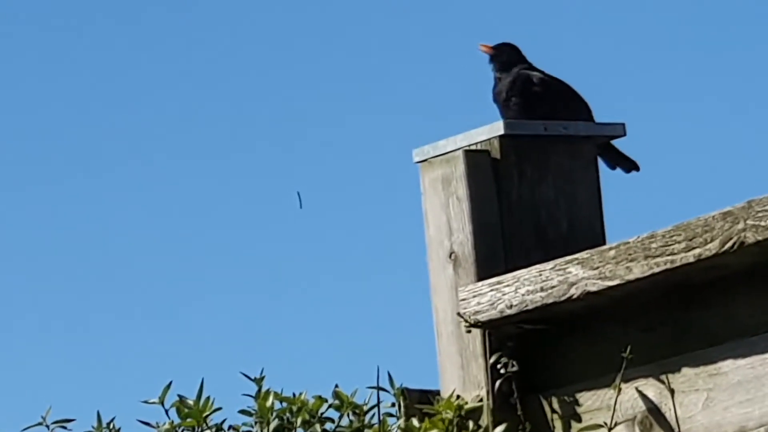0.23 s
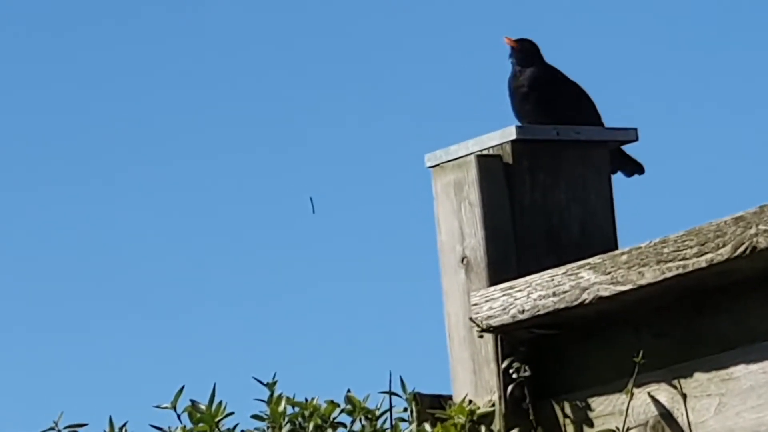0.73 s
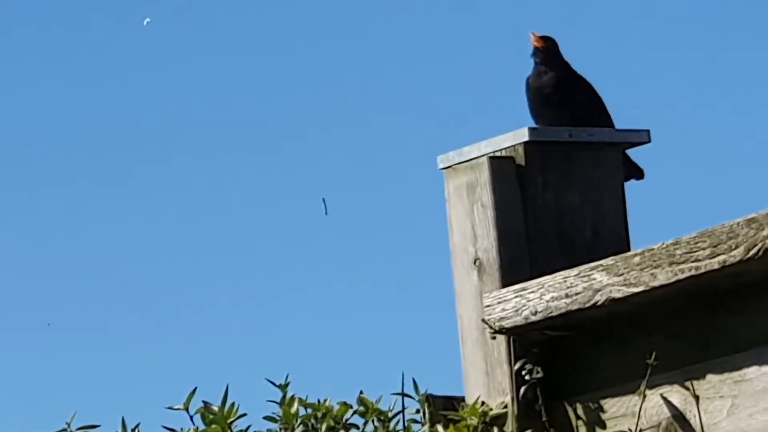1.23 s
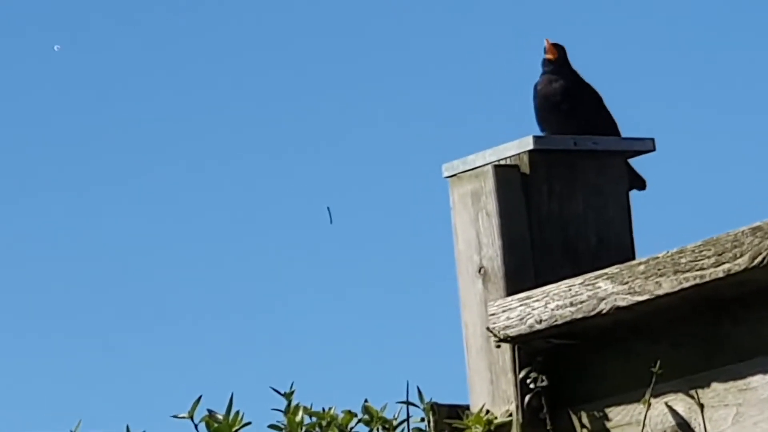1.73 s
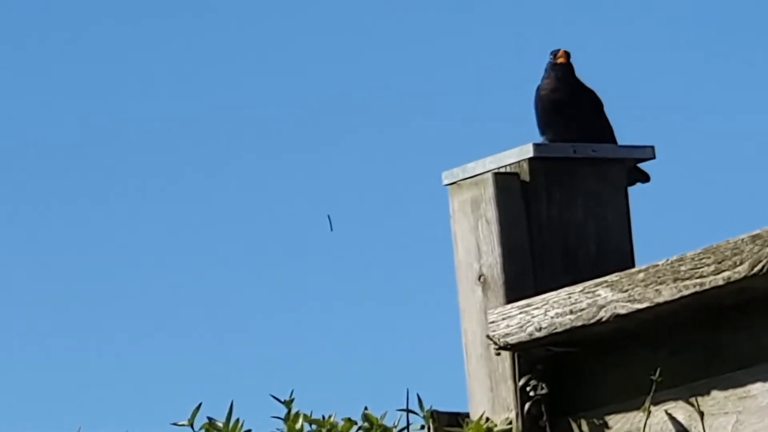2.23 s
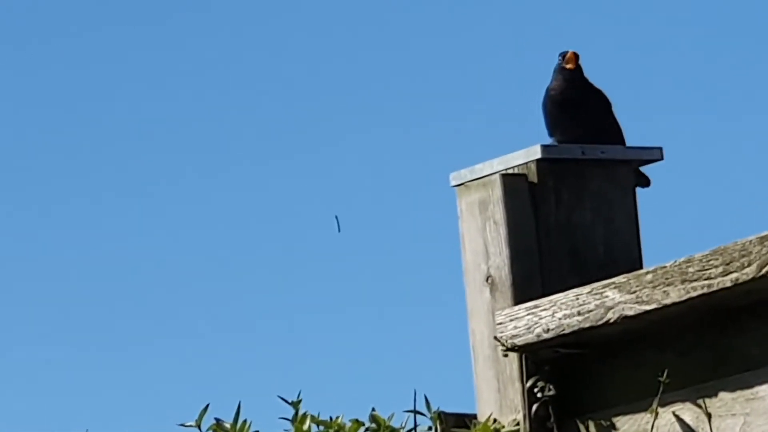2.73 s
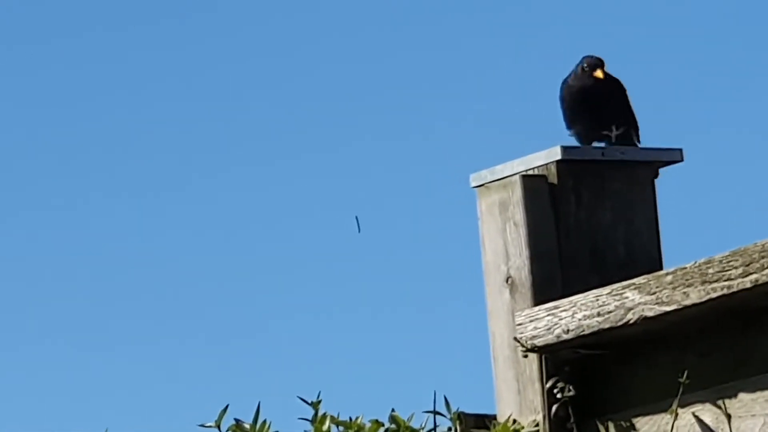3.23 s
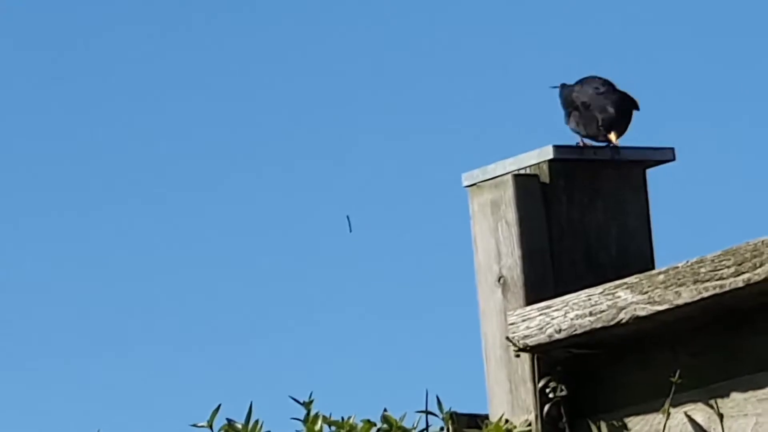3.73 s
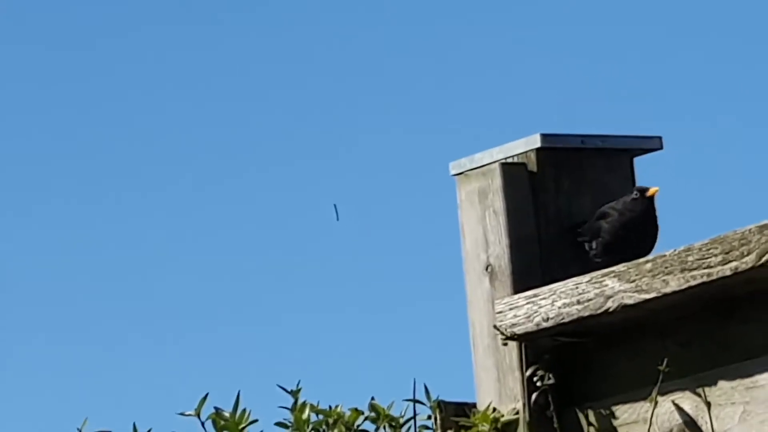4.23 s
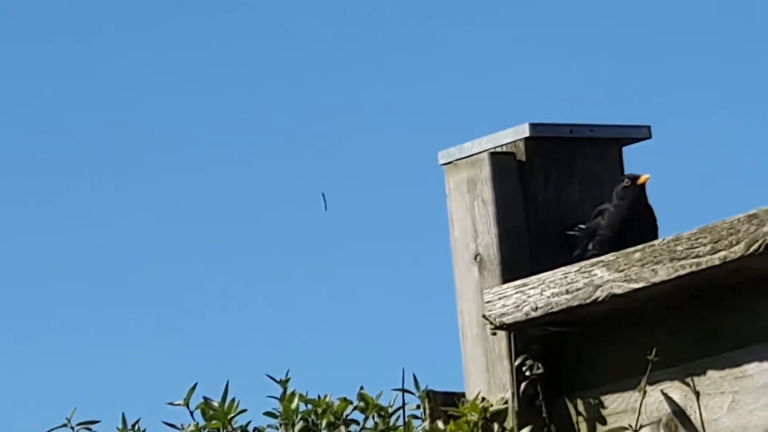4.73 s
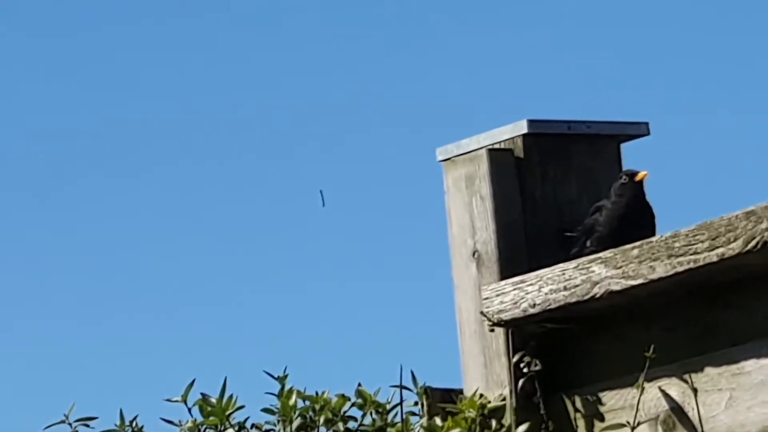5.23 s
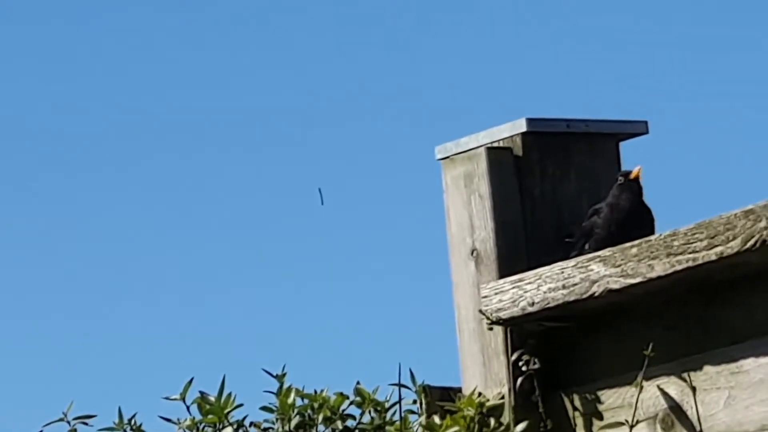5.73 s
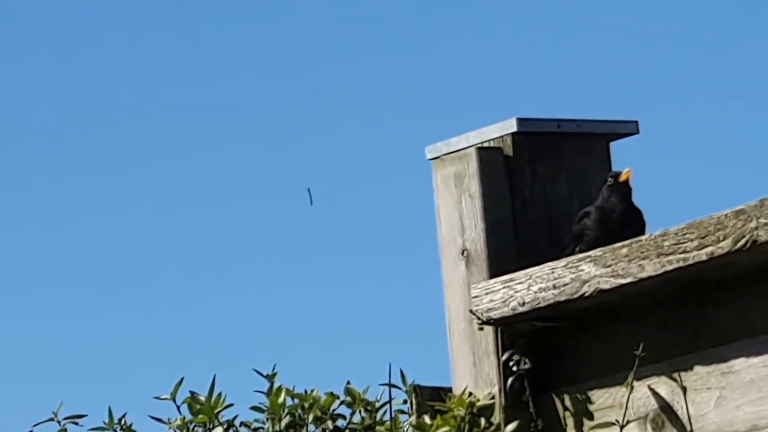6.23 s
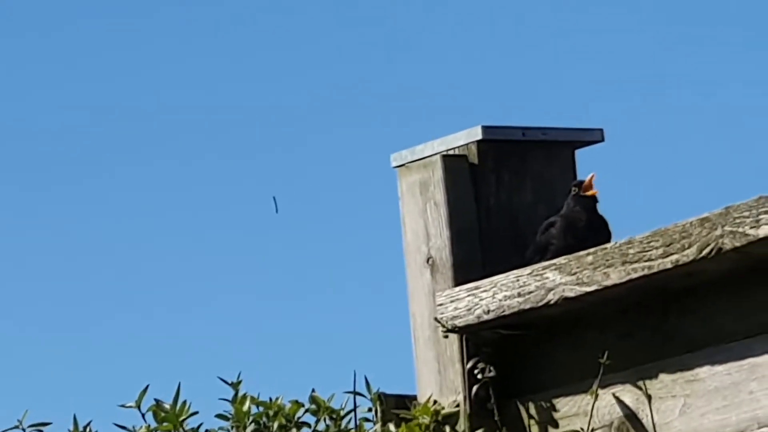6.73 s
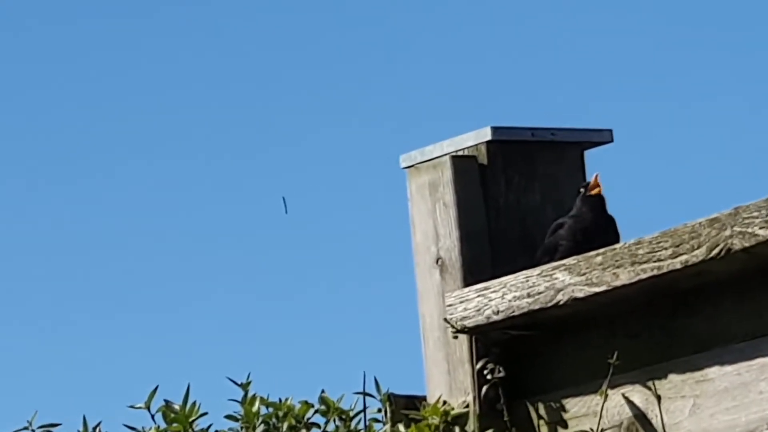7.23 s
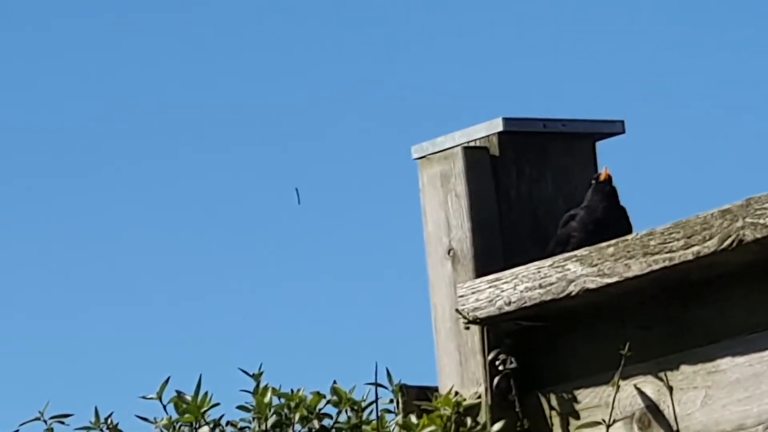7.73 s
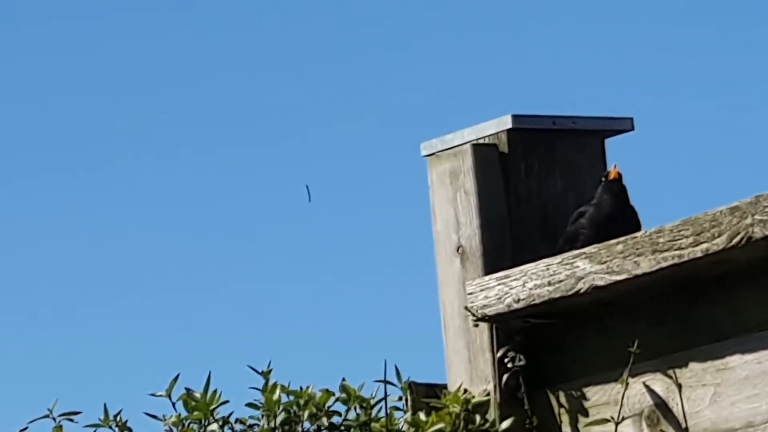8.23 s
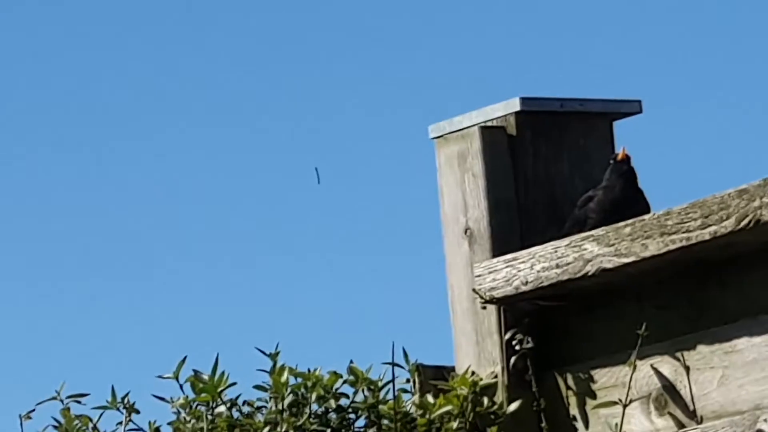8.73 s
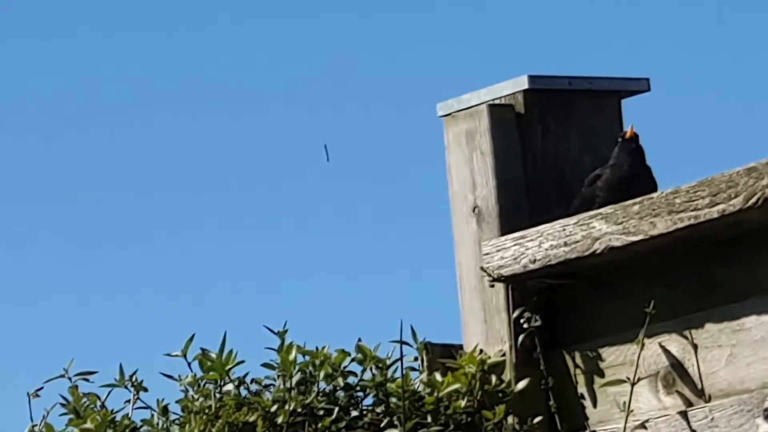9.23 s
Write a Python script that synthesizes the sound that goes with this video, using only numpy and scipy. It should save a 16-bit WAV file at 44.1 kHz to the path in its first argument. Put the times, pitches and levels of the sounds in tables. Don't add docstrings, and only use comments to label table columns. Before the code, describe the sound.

A small stereo camera microphone outdoors catches faint hiss, a steady low electrical hum near 50 Hz and soft distant traffic, with far engines drifting against the hum. At 0.2 s a blackbird begins with a rising flute-like whistle, a loud falling note and a hoarse double tone until 0.8 s. From 1.0 to 2.9 s it sings reedy two-voiced whistles, quick slurs, a loud upward sweep at 2.0 s and a steep climb with a sharp pip. Wings flutter in soft, bassy puffs at 3.0-3.3 s. Near-silence follows, with faint low pips around 4.4-5.2 s. Quiet notes resume at 5.4 s, growing into strong whistles from 6.0 s, a rising note at 6.7 s and a loud falling one at 7.0 s. A buzzy rattle runs 7.25-7.6 s, then thin squeaks and plunging twitters from 7.9 to 8.6 s. Short wall echoes blur the notes; a clear dry tick lands at 9.2 s.

```python
import sys
import numpy as np
from scipy import signal
from scipy.fft import rfft, irfft, next_fast_len
from scipy.io import wavfile
from scipy.ndimage import uniform_filter1d, minimum_filter1d, map_coordinates

SR = 44100
rng = np.random.default_rng(int(sys.argv[2]) if len(sys.argv) > 2 else 0)


def wav_record(signal):
    frames = np.transpose(np.atleast_2d(signal))
    bounded = np.clip(frames, -1, 1)
    quanta = np.round(bounded * 32767).astype(np.int16)
    wavfile.write(sys.argv[1], SR, quanta)


def invert_db(level):
    return 10 ** (np.asarray(level, dtype=float) / 20)


N = 417627


def unit(x):
    return x / np.sqrt(np.mean(x ** 2) + 1e-20)


def along(points, hz):
    f, v = np.transpose(points)
    return np.interp(np.log(hz + 1), np.log(f + 1), v)


def wobble(rate_hz, size=N):
    knots = rng.standard_normal(max(size, SR // 2) * 1500 // SR + 8)
    return map_coordinates(knots, [np.arange(size) * min(rate_hz, 1500) / SR])


def filtered(x, response):
    m = next_fast_len(N + SR // 2)
    return irfft(rfft(x, m) * response(np.fft.rfftfreq(m, 1 / SR)), m)[..., :N]


def add(track, start_s, sound, pan_db):
    part = track[:, round(start_s * SR):][:, :sound.shape[-1]]
    part += invert_db(np.array([[pan_db / 2], [-pan_db / 2]])) * sound[..., :part.shape[1]]


def rush(spectrum):
    # freq_hz, likeness
    alike = [(60, 0.35), (200, 0.33), (640, 0.28), (1400, 0)]
    # freq_hz, level_db
    left = [(60, 4.5), (400, 1.5), (1300, 0.5), (4400, 1), (6500, 9), (8100, 3), (15000, 3.5)]

    def mid_side(hz):
        turn_rad = np.arccos(np.clip(along(alike, hz), -1, 1)) / 2
        return invert_db(along(spectrum, hz)) * [np.cos(turn_rad), np.sin(turn_rad)]

    mid, side = filtered(rng.standard_normal((2, N)), mid_side)
    ports = np.array([mid + side, mid - side])
    return unit(filtered(ports, lambda hz: invert_db(along(left, hz) * [[.5], [-.5]])))


def hiss():
    # freq_hz, density_db (per Hz)
    spectrum = [(530, -17), (900, -6.5), (956, -8), (1250, -10), (1530, -7), (1750, -9.5), (2480, -6),
                (2700, -9), (5130, -15.5), (6530, -9.5), (7740, -22.5), (14700, -8), (16200, -19)]
    return invert_db(-76.5 + 0.396 * wobble(1.6)) * rush(spectrum)


def traffic():
    # freq_hz, density_db (per Hz)
    spectrum = [(35, -31.5), (60, 0), (98, -15), (152, -13.5), (197, -19.5), (247, -22.5), (1200, -37),
                (1560, -68.5), (2640, -120)]
    return invert_db(-67 + 1.6 * wobble(0.96) + 1.2 * wobble(9)) * rush(spectrum)


def engines():
    # time_s, firing_hz, level_db
    vehicles = [
        [(1.1, 55, -72.5), (2, 53.15, -60.5), (2.3, 54.2, -53.5), (2.6, 61, -60), (3.1, 61.06, -64),
         (3.5, 55.18, -67), (3.8, 55.76, -60), (4.3, 55.67, -64), (4.6, 54.14, -71), (5, 53.92, -61.5),
         (5.6, 53.15, -64), (6, 53, -74), (7.5, 58, -75), (8, 58.86, -63), (9.1, 54.3, -66)],
        [(.6, 90, -79), (1.3, 78, -70), (1.9, 66.6, -69.5), (2.3, 61.85, -80)],
    ]
    t = np.arange(N) / SR
    out = np.zeros(N)
    for rows in vehicles:
        s, hz, db = np.transpose(rows)
        phase = 2 * np.pi * np.cumsum(np.interp(t, s, hz)) / SR
        out += np.sqrt(2) * invert_db(np.interp(t, s, db)) * np.sin(phase)
    return out


def hum():
    # time_s, level_db
    swell = [
        (0.0, -52.5),
        (1.53, -52),
        (4.96, -57.5),
        (6.06, -55),
        (9.47, -53.5),
    ]
    # multiple, level_db
    lines = [(2, -74.5), (3, -68), (5, -76.5), (7, -98), (9, -86)]
    s, db = np.transpose(swell)
    phase = 2 * np.pi * np.cumsum(49.12 + .25 * wobble(1.5)) / SR
    low = invert_db(np.interp(np.arange(N) / SR, s, db)) * np.sin(phase + 1.23 * wobble(2.7))
    upper = sum(invert_db(level_db + 1.9 * wobble(6)) * np.sin(k * phase + k) for k, level_db in lines)
    low_pan, upper_pan = invert_db(np.array([[.6], [-.6]])), invert_db(np.array([[2.5], [-2.5]]))
    return np.sqrt(2) * (low * low_pan + upper * upper_pan)


def street():
    lag_s = .00025
    out = hum() + traffic() + engines()
    out[0] = np.roll(out[0], round(lag_s * SR))
    return out


def wings():
    # start_s, peak_db, thump_hz, slap_db
    beats = [
        (3.003, -44, 108, -18),
        (3.051, -49, 72.9, -3),
        (3.082, -40.5, 108.5, -12),
        (3.161, -46, 129, -14),
        (3.186, -41.5, 118, -9),
        (3.263, -41.5, 100.7, -21),
        (6.068, -49, 72.7, -36),
        (6.371, -49, 75.5, -18),
        (8.179, -51.5, 72.7, -27),
        (8.611, -45, 72.7, -33),
    ]
    # start_s, peak_db
    ticks = [
        (3.2605, -65),
        (9.2172, -49),
    ]
    out, t = np.zeros((2, N)), np.arange(SR // 12) / SR
    for s, db, hz, slap_db in beats:
        push = np.sin(2 * np.pi * hz * t) * (t / 0.0035) * np.exp(1 - t / 0.0029)
        slap_hz = 430 + 60 * rng.standard_normal()
        slap = np.sin(2 * np.pi * slap_hz * t) * (t / 0.0013) * np.exp(1 - t / 0.00075)
        wake = 0.11 * wobble(449, size=len(t)) * (t / 0.015) * np.exp(1 - t / 0.013)
        add(out, s + 0.0011, invert_db(db + 1.0) * (invert_db(slap_db + 7) * slap - push + wake), pan_db=20)
    for s, db in ticks:
        snap = .6 * np.diff(rng.standard_normal(len(t) + 1)) + np.sin(2 * np.pi * 6400 * t)
        add(out, s, invert_db(db - 1.5) * snap * np.exp(-t / 0.0014), pan_db=10.0)
    return filtered(out, lambda hz: 1j * hz / (60 + 1j * hz))


def walls(x):
    # freq_hz, t60_s
    t60 = [(1500, .38), (3000, 0.3), (7000, 0.22)]
    hz, t, z = signal.stft(rng.standard_normal((4, SR // 2)), SR, nperseg=256)
    far = invert_db(-60 * (t / along(t60, hz)[:, None]) ** 1.49)
    near = 1.62 * invert_db(-60 * t / 0.12)
    tail = signal.istft(z * (far + near), SR, nperseg=256)[1]
    tail = tail + .1 * tail[::-1]
    late = np.pad(x, ((0, 0), (200, 0)))
    wet = signal.fftconvolve(np.vstack([late, late]), tail / np.linalg.norm(tail[0]), axes=1)[:, :N]
    drift_rad = 1.58 * wobble(24)
    return np.cos(drift_rad) * wet[:2] + np.sin(drift_rad) * wet[2:]


def port_db(hz):
    # freq_hz, gain_db
    left = [(2500, 0.5), (3800, -2), (5200, -5.5), (6500, 11.5), (7300, -16), (8300, -16), (9400, -4),
            (12000, 0.5), (15500, 0.5)]
    # freq_hz, gain_db
    right = [(2500, 2.5), (3800, -1), (5200, -10), (6500, -9), (7300, -20.5), (8300, -23.5), (9400, -12),
             (12000, -12), (15500, -12.5)]
    return np.array([along(left, hz), along(right, hz)])


def rattle():
    # start_s, blip_hz, blip_db, buzz_db
    strokes = [
        (7.247, 4460, -51.5, -64.5),
        (7.264, 4530, -43, -62.5),
        (7.283, 4500, -47, -61.5),
        (7.319, 4610, -46.5, -59.5),
        (7.347, 4270, -42, -55.5),
        (7.394, 4200, -56, -57),
        (7.439, 4450, -51.5, -57.5),
        (7.482, 4180, -45, -56.5),
        (7.522, 4220, -46, -56.5),
        (7.563, 4460, -44.5, -66),
    ]
    blip_s, buzz_hz, last_buzz_s = .0075, 621, .04
    out = np.zeros((2, N))
    lengths_s = np.append(np.diff([row[0] for row in strokes]), last_buzz_s)
    for (s, blip_hz, blip_db, buzz_db), length_s in zip(strokes, lengths_s):
        u = np.arange(round(blip_s * SR)) / (blip_s * SR)
        fall = 2 * np.pi * np.cumsum(blip_hz * (1.07 - .15 * u)) / SR
        add(out, s, invert_db(blip_db + 6.0) * np.sin(np.pi * u) * np.sin(fall), pan_db=3.0)

        u = np.arange(round(1.3 * length_s * SR)) / (1.3 * length_s * SR)
        pitch_hz = buzz_hz * (1.04 - .08 * u) + 45 * wobble(300, size=len(u))
        phase = 2 * np.pi * np.cumsum(pitch_hz) / SR
        shut_db = -1.5 * (s < 7.34)
        buzz = np.zeros((2, len(u)))
        for k in range(3, 26):
            throat_db = -.5 * k - 18.5 * (k > 11) - 4.7 * (k == 3) + 3 * (5 < k < 8) - 3 * (7 < k < 10)
            throat_db += shut_db * ((k < 6) + 3.3 * (k == 5) - 10 * (k > 14))
            gain = invert_db(port_db(k * buzz_hz) + throat_db)[:, None]
            shake = invert_db(4 * wobble(220, size=len(u)) - 3.0)
            buzz += gain * shake * np.sin(k * phase + 1.3 * k * k)
        swell = np.sin(np.pi * u) ** 0.69 * invert_db(3.5 * wobble(600, size=len(u)) - 1.0)
        add(out, s, invert_db(buzz_db + 7.0) * swell * buzz, pan_db=-2.0)
    return out


def contour(u, start_hz, end_hz, held, haste):
    v = np.clip((u - held) / (1 - held), 0, 1)
    return start_hz + (end_hz - start_hz) * np.expm1(-haste * v) / np.expm1(-haste)


def sing(out, notes, haste, attack, release, sag_db, loss_db, rough_hz, strain_db, held=0, strongest=1):
    # freq_hz, left_right_db
    left_lean = [(1800, -3), (2500, 2), (4500, 5.5), (5400, 9), (6300, 18)]
    air_db, shrill_db = -35.5, 5
    for s, length_s, start_hz, end_hz, db in notes:
        t = np.arange(0, length_s + .012, 1 / SR)
        u, n = t / t[-1], len(t)
        aim_hz = contour(u, start_hz, end_hz, held, haste)
        pitch_hz = uniform_filter1d(aim_hz, size=300) + 0.76 * rough_hz * wobble(250.4, size=n)
        phase = 2 * np.pi * np.cumsum(pitch_hz) / SR / strongest
        tone, port = np.zeros((2, n)), port_db(pitch_hz)
        for k in range(1, 15):
            if k * min(start_hz, end_hz) > 16000 * strongest:
                break
            step = k - strongest
            partial_hz = k * pitch_hz / strongest
            heard = invert_db(port_db(partial_hz) - port) * (partial_hz < 16000)
            clear = invert_db(loss_db * abs(step) ** 0.42 * (.55 if step < 0 else 1)) * (partial_hz < 8200)
            clear = clear * (1 + .5 * min(abs(step), 1) * wobble(299, size=n))
            strain = invert_db(strain_db - 4.5 + shrill_db * (partial_hz > 8200))
            hoarse = strain * wobble(900, size=n) * (step > 0)
            tone += heard * (clear + hoarse) * np.sin(k * phase)
        breath = np.clip(np.minimum(u / attack, (1 - u) / release), 0, 1)
        breath = breath * invert_db(sag_db * np.maximum(u - attack, 0))
        size = invert_db(db + 1.6 * wobble(69.9, size=n)) * breath
        glide_hz_per_s = uniform_filter1d(np.abs(np.gradient(aim_hz)) * SR, size=400)
        blotch = (rough_hz / 350 + np.minimum(glide_hz_per_s / 52000.0, .4)) * wobble(450, size=n)
        air = invert_db(air_db) * min(rough_hz / 45, 1.6) * wobble(1450, size=n)
        sound = np.sqrt(2) * size * (1 + blotch + air) * tone
        add(out, s, sound, along(left_lean, max(start_hz, end_hz)))


def twitter():
    out = np.zeros((2, N))
    # start_s, length_s, start_hz, end_hz, level_db
    plunging = [
        (8.246, .085, 5350, 2890, -54),
        (8.403, .065, 5170, 3160, -49.5),
        (8.515, .07, 5040, 3145, -51.5),
    ]
    sing(out, plunging, haste=0.83, attack=.15, release=.25, sag_db=-23,
         loss_db=-40, rough_hz=125, strain_db=-31, held=.27)
    # start_s, length_s, start_hz, end_hz, level_db
    far = [
        (.35, .21, 5150, 5940, -75),
    ]
    sing(out, far, haste=2.2, attack=.3, release=0.19, sag_db=1.8,
         loss_db=-40, rough_hz=31, strain_db=-27, held=0.35)
    # start_s, length_s, start_hz, end_hz, level_db
    wheeze = [
        (7.237, .15, 6395, 6310, -58.5),
    ]
    sing(out, wheeze, haste=.4, attack=0.13, release=0.25, sag_db=-1.2,
         loss_db=-40, rough_hz=210, strain_db=-28)
    # start_s, length_s, start_hz, end_hz, level_db
    thin = [
        (7.87, 0.087, 6570, 6920, -60),
        (7.942, .02, 6660, 6570, -61.5),
        (7.96, 0.064, 6300, 6210, -64),
        (8.03, 0.066, 6400, 6560, -66),
        (8.085, .14, 6470, 6834, -56.5),
        (8.13, .045, 4900, 4880, -80),
        (1.09, .25, 4700, 4410, -74),
        (8.25, 0.045, 5880, 5950, -67),
        (9.16, 0.051, 6480, 6460, -71.5),
    ]
    sing(out, thin, haste=2, attack=.35, release=0.22, sag_db=-1.2,
         loss_db=-40, rough_hz=53.5, strain_db=-30)
    # start_s, length_s, start_hz, end_hz, level_db
    pips = [
        (2.608, 0.05, 4730, 4700, -52),
        (4.515, 0.15, 2610, 2430, -60),
        (4.92, 0.093, 2507, 2357, -63),
        (8.405, 0.049, 6430, 6170, -61.5),
        (8.525, .07, 6240, 6160, -69),
        (8.625, 0.054, 5900, 5700, -73),
    ]
    sing(out, pips, haste=2.4, attack=0.098, release=0.49, sag_db=-3.5,
         loss_db=-40, rough_hz=46, strain_db=-32)
    # start_s, length_s, start_hz, end_hz, level_db
    hissed = [(.98, .1, 3100, 3300, -59.5), (1.645, .06, 2150, 2300, -52.5), (4.62, .17, 2350, 2260, -71.5),
              (8.245, .04, 5000, 4900, -58.5), (8.29, .06, 3600, 3000, -61.5), (8.43, .1, 3500, 3500, -69),
              (8.55, .08, 4000, 3400, -69.5), (6.01, .05, 2800, 2750, -68),
              (6.36, 0.036, 2500, 3400, -63.5), (7.245, .1, 3700, 3500, -62.5),
              (2.55, .1, 12500, 11500, -72), (2.61, .06, 8300, 8300, -72), (.99, .1, 6300, 6500, -66.5),
              (1.42, 0.089, 3200, 3100, -63.5), (1.03, 0.118, 5000, 5900, -73),
              (1.45, .1, 6700, 5900, -73.5), (2.5, .06, 6400, 7400, -67.5), (2.51, .05, 3200, 4600, -68),
              (2.543, .03, 4600, 4700, -60), (7.25, .14, 5100, 5400, -60), (7.36, 0.18, 3300, 3100, -58.5),
              (2.57, .035, 6700, 6200, -56), (2.585, .05, 5900, 4800, -58.5), (2.6, 0.1, 4250, 4000, -63.5),
              (2.6, 0.11, 5400, 5300, -63.5), (2.73, .12, 4600, 6700, -69), (7.885, 0.066, 4500, 4400, -73),
              (7.37, .14, 2690, 2200, -55), (7.47, 0.1214, 6320, 6290, -66)]
    sing(out, hissed, haste=.4, attack=0.26, release=.3, sag_db=-1.2,
         loss_db=-40, rough_hz=270, strain_db=-26.5)
    # start_s, length_s, start_hz, end_hz, level_db
    mixed = [
        (1.03, 0.11, 3670, 3810, -62),
        (1.44, .07, 3760, 3700, -67),
        (1.46, 0.11, 4900, 4670, -73),
        (1.66, 0.13, 3510, 4470, -75),
        (6.44, .12, 4650, 4180, -64.5),
        (7.06, 0.12, 4700, 4460, -71),
        (7.885, 0.087, 2495, 2553, -67),
        (7.9, .06, 2020, 2080, -74.5),
        (7.92, .06, 5450, 5300, -70.5),
    ]
    sing(out, mixed, haste=2.5, attack=.12, release=.45, sag_db=-4,
         loss_db=-49, rough_hz=148.5, strain_db=-44.5)
    return out


def song():
    out = np.zeros((2, N))
    # start_s, length_s, start_hz, end_hz, level_db
    fluted = [
        (1.985, .3, 1683, 2554, -37.5),
    ]
    sing(out, fluted, haste=4.2, attack=.3, release=0.17, sag_db=-2.2,
         loss_db=-36, rough_hz=76, strain_db=-33)
    # start_s, length_s, start_hz, end_hz, level_db
    fading = [
        (6.965, .2, 2798, 2199, -34),
    ]
    sing(out, fading, haste=2.6, attack=.33, release=0.24, sag_db=-13,
         loss_db=-44, rough_hz=70, strain_db=-38)
    # start_s, length_s, start_hz, end_hz, level_db
    openers = [
        (.21, .235, 1290, 1992, -43.5),
        (1.42, .062, 1662, 1863, -48),
    ]
    sing(out, openers, haste=3.5, attack=.45, release=0.18, sag_db=-2.1,
         loss_db=-46, rough_hz=34, strain_db=-43)
    # start_s, length_s, start_hz, end_hz, level_db
    reedy = [
        (1.01, .35, 1769, 1935, -45.5),
        (1.105, 0.24, 2680, 2410, -41.5),
        (1.445, 0.049, 3185, 2814, -48.5),
        (1.54, 0.053, 2802, 2785, -44.5),
        (2.812, 0.087, 3800, 3884, -49),
        (1.5, .07, 2090, 1990, -54),
    ]
    sing(out, reedy, haste=3.4, attack=.2, release=.2, sag_db=-2.1,
         loss_db=-33, rough_hz=60, strain_db=-30.5)
    # start_s, length_s, start_hz, end_hz, level_db
    tipped = [
        (.425, .11, 1975, 1750, -39),
        (1.518, .035, 1880, 1600, -43.5),
        (2.26, .06, 2540, 2200, -44.5),
        (6.21, .058, 2060, 1600, -40.5),
        (5.53, .11, 2070, 2500, -45.5),
    ]
    sing(out, tipped, haste=-3, attack=.3, release=.15, sag_db=-.6,
         loss_db=-44, rough_hz=41.5, strain_db=-42)
    # start_s, length_s, start_hz, end_hz, level_db
    bright = [
        (1.79, .095, 3111, 3003, -42),
        (1.892, 0.02, 2932, 2830, -39),
    ]
    sing(out, bright, haste=-3.5, attack=0.23, release=.1, sag_db=1.8,
         loss_db=-26, rough_hz=22, strain_db=-30)
    # start_s, length_s, start_hz, end_hz, level_db
    climbs = [
        (2.71, .14, 2245, 3400, -43.5),
    ]
    sing(out, climbs, haste=-.3, attack=.25, release=0.13, sag_db=-4,
         loss_db=-21, rough_hz=105, strain_db=-28.5)
    # start_s, length_s, start_hz, end_hz, level_db
    steady = [(1.49, 0.048, 2800, 2770, -41), (4.36, .155, 2000, 2076, -71), (4.98, 0.3, 2365, 2305, -61),
              (5.39, 0.074, 1814, 1832, -58), (5.48, 0.076, 2870, 2870, -81),
              (5.645, 0.12, 3228, 3305, -53), (5.79, .12, 2050, 2066, -75.5),
              (5.94, 0.066, 2524, 2510, -53), (6.0, 0.055, 2520, 2460, -45.5),
              (6.0, 0.074, 2050, 2030, -44.5), (6.065, .1, 2035, 2048, -38), (6.15, 0.072, 2050, 2053, -49)]
    sing(out, steady, haste=0.27, attack=0.28, release=0.26, sag_db=-2.1,
         loss_db=-43, rough_hz=24.5, strain_db=-38)
    # start_s, length_s, start_hz, end_hz, level_db
    hoarse = [(.635, 0.19, 2545, 2408, -41.5), (.64, .16, 2123, 1950, -50), (.66, 0.14, 2254, 2075, -48),
              (1.91, 0.025, 2790, 2390, -53.5), (.965, 0.045, 2802, 3120, -55.5),
              (1.0, 0.091, 3145, 3020, -47.5), (1.08, .035, 3000, 2646, -46), (2.03, 0.22, 1900, 2300, -46),
              (8.28, 0.013, 4520, 4310, -53), (8.433, .012, 4580, 4370, -52.5),
              (8.54, 0.011, 4530, 4370, -54), (1.648, 0.14, 1808, 2152, -48.5),
              (1.675, .14, 2440, 2126, -41), (5.43, 0.047, 1833, 1413, -58.5), (5.48, .14, 1414, 1748, -57),
              (5.63, 0.021, 2500, 3170, -53), (8.26, .04, 3010, 2890, -71), (6.26, .08, 1900, 1500, -56.5),
              (6.2, 0.038, 2478, 2345, -49.5), (2.675, .1, 1980, 2148, -53),
              (2.68, 0.11, 2350, 2310, -56.5), (6.39, .11, 2328, 2330, -44.5), (6.5, .1, 2400, 2502, -38),
              (6.52, 0.082, 2800, 2760, -51), (7.262, .05, 2407, 2386, -52),
              (6.5, 0.091, 2120, 2156, -45.5), (7.48, .11, 3780, 3850, -54.5),
              (8.09, 0.11, 3950, 3910, -79.5), (8.325, 0.051, 2805, 2610, -60.5),
              (8.475, 0.023, 3150, 2990, -57.5), (8.5, 0.052, 2700, 2682, -67.5),
              (8.585, .06, 3196, 2684, -62.5)]
    sing(out, hoarse, haste=1.2, attack=0.16, release=0.24, sag_db=-.2,
         loss_db=-45, rough_hz=92, strain_db=-35)
    # start_s, length_s, start_hz, end_hz, level_db
    stacked = [
        (6.715, .19, 2300, 2950, -39),
    ]
    sing(out, stacked, haste=3, attack=.3, release=.3, sag_db=3.7,
         loss_db=-30, rough_hz=33.5, strain_db=-40, strongest=3)
    # start_s, length_s, start_hz, end_hz, level_db
    nasals = [
        (6.385, .11, 3250, 3472, -50.5),
    ]
    sing(out, nasals, haste=4, attack=.35, release=.3, sag_db=-0.5,
         loss_db=-12, rough_hz=95.5, strain_db=-32.5, strongest=3)
    return out


def bird():
    # freq_hz, phase_rad
    trail = [(1500, 1.8), (1900, 1.18), (3000, 1.55), (3800, 0.91), (4700, .5), (6400, 0.85)]

    def throat_and_notch(hz):
        return 1 / (1 + (1400 / (hz + 1)) ** 18) * invert_db(-5 * (np.abs(hz - 7900) < 800))

    def lag(hz):
        return np.exp(-.5j * along(trail, hz) * np.array([[1], [-1]]))

    direct = filtered(song() + twitter() + rattle(), throat_and_notch)
    return filtered(invert_db(-4) * direct + invert_db(-4.5) * walls(direct), lag)


def scene():
    return hiss() + street() + wings() + bird()


def roll_off(x):
    return signal.sosfilt(signal.butter(12, 16320, fs=SR, output="sos"), x)


def record(dry):
    z = signal.stft(filtered(dry, lambda hz: hz < 15750), nperseg=1024)[2]
    power = uniform_filter1d(np.abs(z) ** 2, size=8, axis=1)
    loudest_below = -minimum_filter1d(-power, size=31, axis=1, origin=15)
    bins = np.arange(z.shape[1])
    margin_db = np.interp(bins, [66, 67, 120, 165], [-150, -41, -41, -33])[:, None]
    z = z * (power > invert_db(2 * margin_db) * loudest_below)
    mix = signal.istft(z, nperseg=1024)[1][:, :N]
    return roll_off(mix)


dry = scene()
out = record(dry)
wav_record(out)
```